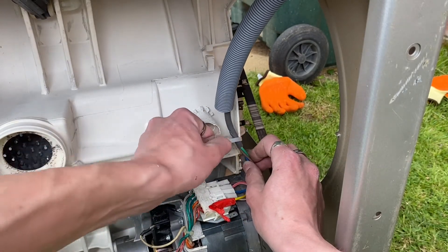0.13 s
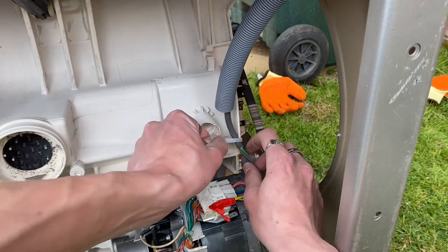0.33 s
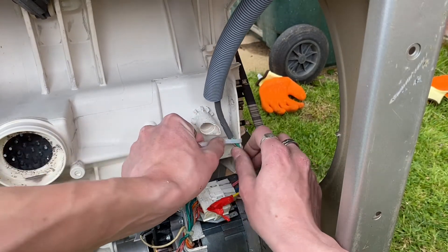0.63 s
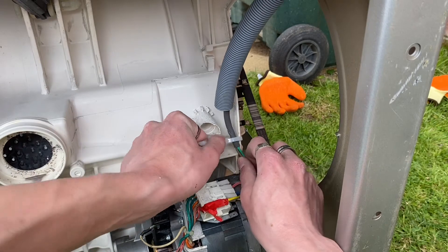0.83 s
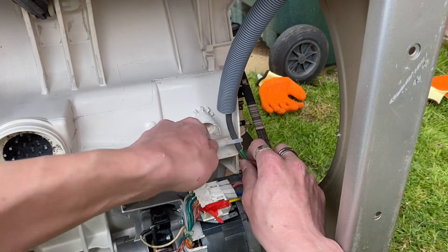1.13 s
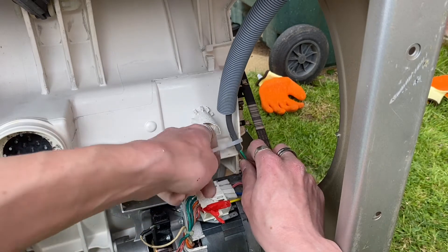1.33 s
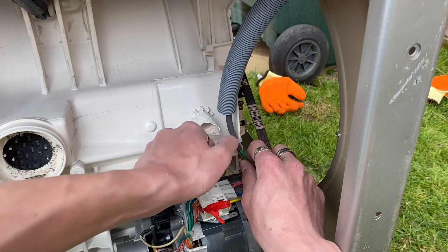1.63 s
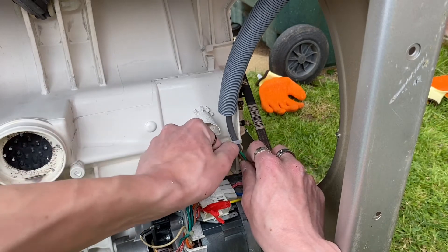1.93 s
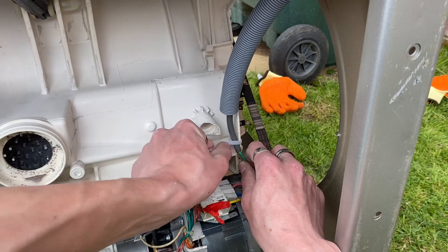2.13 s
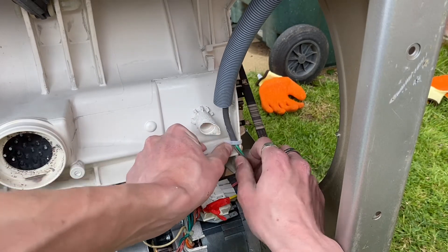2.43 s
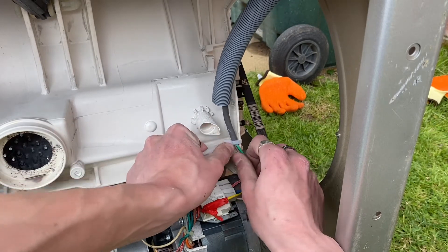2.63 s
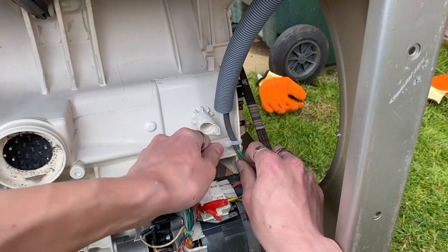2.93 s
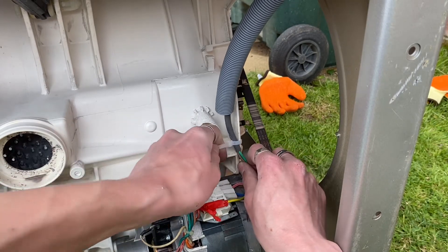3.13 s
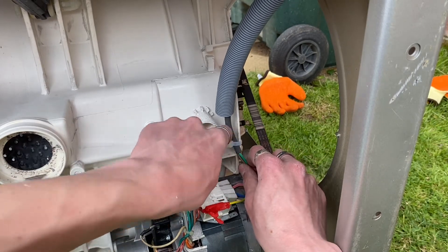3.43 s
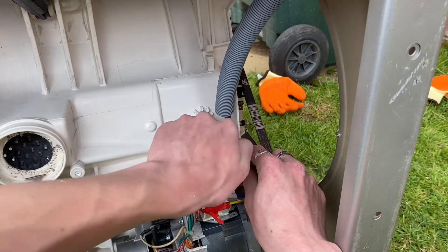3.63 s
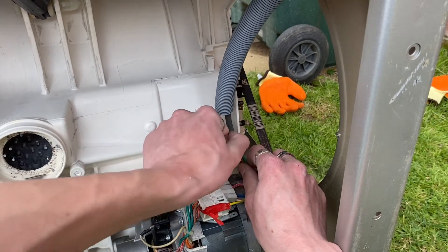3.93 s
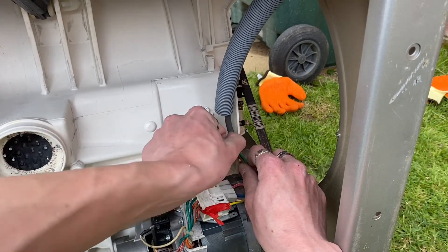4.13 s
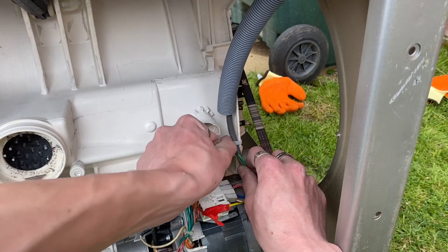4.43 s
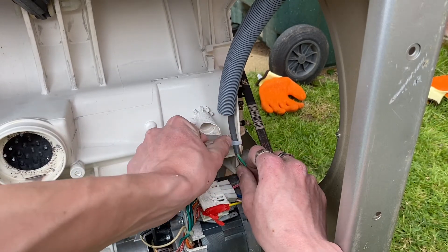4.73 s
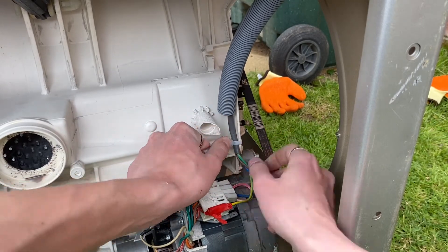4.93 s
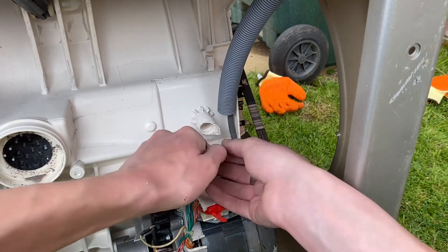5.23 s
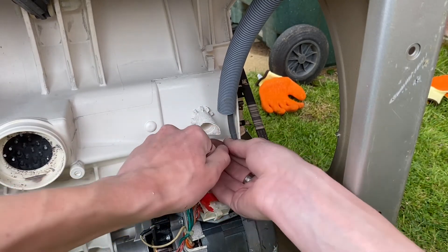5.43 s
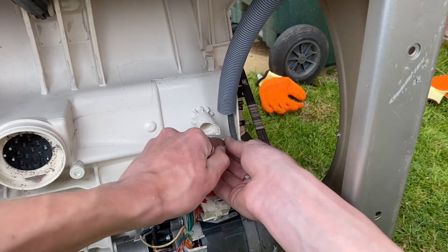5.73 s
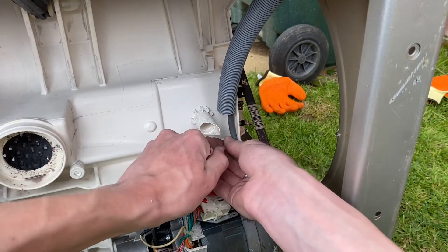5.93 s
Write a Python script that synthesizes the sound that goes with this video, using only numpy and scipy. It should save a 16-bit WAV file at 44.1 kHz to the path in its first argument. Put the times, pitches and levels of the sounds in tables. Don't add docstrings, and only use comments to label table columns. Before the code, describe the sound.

Close, dry outdoor sound of a cable tie being tightened by hand on a hollow plastic tub, over quiet low rumble and faint yard air. It begins at once with a fast zip of about twenty bright, crisp clicks, evenly packed to 0.3 s and slowing to separate ticks by 0.5, with a dull tick near 0.7. Light, scratchy fingertip scuffs and sleeve rustle fill 0.75 to 1.6. A second burst starts at 1.85, quickens around 2.0 to 2.2 and ends at 2.35. More scuffs follow from 2.8, with a muffled tick and small knock at 3.2 and a bright tick at 3.3. From 4.16 to 4.6 come eight slow, hard clicks, with a short jolt at 4.3 and a low thud at 4.5. Around 5.2 a palm drags softly and knuckles bump the tub; another bump comes at 5.5, the strongest snap at 5.63, and a lighter tick at 5.8.

```python
import sys
import numpy as np
from scipy import signal
from scipy.fft import rfft, irfft, next_fast_len
from scipy.io import wavfile
from scipy.ndimage import uniform_filter1d

SR = 44100
rng = np.random.default_rng(int(sys.argv[2]) if len(sys.argv) > 2 else 0)


def wav_record(signal):
    frames = np.transpose(np.atleast_2d(signal))
    bounded = np.clip(frames, -1, 1)
    quanta = np.round(bounded * 32767).astype(np.int16)
    wavfile.write(sys.argv[1], SR, quanta)


def linear_from_db(decibels):
    return 10 ** (np.asarray(decibels, float) / 20)


N = 267995

AIR_EDGES_HZ = [0, 160, 1200, 6000, 12500, 15900]
# frequency_hz, density_db
AIR_COLOUR = [(20, -40), (32, -21.5), (45, 4.5), (60, 3), (100, -2.5), (200, -9), (400, -11), (700, -13),
              (1000, -21.5), (2000, -27.5), (4000, -35.5), (6500, -41.5), (12000, -46), (16000, -43)]
# frequency_hz, correlation_ratio
AIR_LIKENESS = [(60, 0.969), (130, 0.866), (300, 0.69), (700, .1), (2000, 0.24), (6000, 0.12)]
# start_s, level_db
YARD_SWELL = [(0, 8), (.5, 6), (1.2, 1), (1.75, 1.5), (2.1, 4.5), (2.8, 2.1), (3.2, 1), (4.0, 1.5),
              (4.58, 4.5), (4.68, -11.5), (5.2, 1.5), (5.36, 3), (6.08, -0.5)]
# start_s, level_over_rest_db
HAND_MOTION = [(0, 28.5), (.24, 30.5), (.4, 12.5), (.9, 7.5), (1.3, 10.5), (1.8, 2), (2.1, 26), (2.45, 1.5),
               (2.7, 4.5), (2.88, 9.5), (3.12, 6.5), (3.38, 18), (3.9, 2), (4.4, 17), (4.7, 8), (5.21, 13),
               (5.28, 22), (5.85, 6)]
# rest_db, yard_share_ratio, motion_share_ratio, flicker_db
AIR_LAYERS = [
    (-57, 0.84, 0.03, -0.3),
    (-61.5, 0.47, 0.167, 0.5),
    (-72.5, 0, 0.37, 0.6),
    (-92.5, 0, 1.09, 0.8),
    (-99, 0.23, 1.05, -1.15),
]

# frequency_hz, width_hz, level_db # bright ring near 15.5 kHz that opens each click
SNAP_MODES = [(15900, 900, -18), (15480, 810, 5), (14900, 500, -6.5), (14100, 690, -14),
              (13200, 1500, -20.5)]
PAWL_MODES = [(6800, 410, 0.5), (7790, 500, -6), (7960, 3600, -5), (10500, 790, -5), (11720, 2500, -8.5)]
STRAP_MODES = [(4300, 64, -12.5), (4900, 260, -8), (4965, 250, 12), (5310, 65, -0.5), (5610, 650, -6.5),
               (6030, 300, -1.5)]
SHELL_MODES = [(1672.6, 100, 2.5), (1938, 52, 4), (2144, 160, -2.5), (2655, 240, -9), (2900, 300, -8),
               (3015, 70, -9), (3277, 110, -9.5), (3620, 270, -16.5)]
UPPER_TUB_MODES = [(981, 43, 3), (1040, 47, 1), (1147, 98, -0.5), (1311, 75, 5.5)]
LOWER_TUB_MODES = [(405, 17, -2), (536, 87, -3.5), (610, 18, 0.5), (675, 25, 2.5), (717, 13, -1)]
# low_hz, high_hz, trim_db, scatter_t60_s, likeness_ratio (-1 to
# 1), left_over_right_db
PARTS = [
    (12220, 15000, 1.3, 0.028, -0.79, 1),
    (6380, 11000, -1, 0.028, 0.48, 0.5),
    (4040, 5700, -3, 0.042, 0.58, 8),
    (1660, 3870, 0.5, 0.067, 0.21, 3.5),
    (880, 1320, -1, 0.12, -0.27, 4.5),
    (333, 676, -3.5, 0.062, 0.74, 2.5),
]

# start_s, force_db, snap_re_force_db
FIRST_PULL = [(0.012, -40, 4), (0.03, -43, 10.5), (0.0459, -40.5, 5), (0.0599, -41, 4.5),
              (0.0743, -42.5, 4.5), (0.0893, -45, 4), (0.1042, -41, 2), (0.1189, -47.5, 7.5),
              (0.1336, -43, 0), (0.1489, -43.5, -1), (0.1637, -44, 4.5), (0.1799, -43.5, 6),
              (0.1958, -45.5, 5.5), (0.2126, -44.5, 5), (0.2297, -43.5, 6.5), (0.2472, -45.5, 2.5),
              (0.2669, -43.5, 3), (0.2876, -44, 3), (0.3128, -43.5, 4), (0.3432, -43, 4),
              (0.3834, -43.5, 6), (0.4415, -45, 7), (0.5119, -45.5, 7)]
SECOND_PULL = [(1.8521, -42, -0.5), (1.9048, -38, 0.5), (1.9312, -39, 1.2), (1.953, -41, -1),
               (1.9814, -44, -1), (2.0063, -41.5, 2), (2.0266, -40.5, 1), (2.0413, -41, -0.43),
               (2.0581, -39, 2), (2.0748, -40.5, 3), (2.0918, -40.5, 6.5), (2.1082, -42, 5.5),
               (2.1233, -40.5, 9.5), (2.1381, -38.5, 8), (2.152, -39, 6.5), (2.1683, -37, -1.5),
               (2.1932, -38, -1), (2.2228, -39.5, -2.3), (2.2673, -43, 3), (2.3498, -41.5, 0)]
THIRD_PULL = [
    (4.159, -39, -1.7),
    (4.194, -39, -3),
    (4.2478, -43, -2),
    (4.311, -41.5, 10),
    (4.3754, -38, 7.5),
    (4.4256, -38, 9.5),
    (4.4944, -39, 8.5),
    (4.5866, -38.5, 5.5),
]
LONE_TICKS = [
    (0.646, -70.5, -2),
    (0.727, -48.5, -8.5),
    (3.1898, -48.5, -19),
    (3.3086, -40.5, 7),
    (5.6269, -33, -1.5),
    (5.7921, -45.5, 1),
]
# start_s, direct_over_scatter_db, pawl_tilt_db_per_octave, shell_tilt_db_per_octave, finger_damping_ratio
GRIP = [(0, 13.5, 13, 11.5, 0.92), (.25, 8, -9, 24, 1.3), (.5, 28.5, 26.5, 17.5, 1.4),
        (.72, -9, 39, -9.5, 1.56), (1.85, 13.5, -24, 22, 2.14), (2.12, 15, -9.5, 12, 1.25),
        (2.35, 14, -21, 7, 1.42), (3.19, -17, -36.5, 19, 1.4), (3.31, 5.5, 21, 18, 1.3),
        (4.24, 14.5, 23, -13.5, 1.15), (4.31, 24, -5.5, -1.5, 1.7), (4.6, 21, -16, -20.5, 1.4),
        (5.62, 14, 47, 2, 5.7)]
# start_s, strap_re_force_db, shell_re_force_db, tub_re_force_db, upper_over_lower_tub_db
CONTACT = [(0.03, -8, -10.5, -4, 2), (.2, 1, -5, -3.5, -1), (.44, -4.5, -1.1, -8.5, -2),
           (.51, -1, 3, 1.7, -0.5), (.646, 21.5, 6, 6, 0), (.727, -5.5, 4.5, 8, 3.5),
           (1.85, 1.5, -3, -5, 3), (2.0, 1.5, -1.5, -3, -0.5), (2.15, 4, -5.5, -8.5, -4),
           (2.35, 5, -9.5, -7.5, 5.5), (3.19, 0, -1.5, -1.3, -2), (3.31, 6.5, -4.5, -3, 0.5),
           (4.2, 1, -10.5, -3.2, 1.2), (4.31, 7, -5.5, 1, -3), (4.44, 5, -12.5, -10, -4.5),
           (4.59, -1.5, -20.5, -13, 1), (5.63, -16, -15, -23, -5)]

# start_s, treble_db, body_re_treble_db (pressure), length_s
SCUFFS = [(0.754, -54, 3, 0.028), (0.781, -65, 17.5, 0.062), (0.816, -64, 11, 0.021),
          (0.89, -56, -14, 0.02), (1.066, -43.5, -18, 0.055), (1.243, -57.5, 3.5, 0.026),
          (1.265, -57, -6, 0.03), (1.2826, -62, 10.5, 0.021), (1.325, -57.5, -16, 0.024),
          (1.383, -58, -19, 0.039), (1.45, -70, 12.5, 0.023), (1.593, -58.5, -26, 0.027),
          (2.825, -53, -5.5, 0.034), (2.8893, -44.5, -13, 0.047), (3.079, -80, 29.5, 0.024),
          (3.162, -75, 20.5, 0.019), (3.2664, -55.5, 7.5, 0.026), (3.4354, -51, -9.5, 0.015),
          (3.47, -54, -4.5, 0.025), (3.512, -56.5, -17.5, 0.025), (3.613, -69.5, 7.5, 0.017),
          (3.6525, -54, 11.5, 0.033), (3.8659, -66, 4, 0.022), (4.8469, -57.5, 5, 0.034),
          (5.125, -73, 15, 0.013), (5.156, -73.5, 21, 0.067), (5.245, -44, -20.5, 0.047),
          (5.3494, -64.5, 3, 0.025), (6.049, -74, 11.5, 0.023)]
# start_s, level_db, pitch_hz, t60_s
BUMPS = [
    (3.194, -40, 366, .14),
    (3.192, -43, 265, .07),
    (4.51, -40, 95, .08),
    (5.262, -43.5, 372, .11),
    (5.538, -42, 262, .07),
]
# start_s, level_db, pitch_hz, t60_s
JOLT = [
    (4.311, -31, 416, 0.026),
    (4.312, -31, 233, 0.023),
    (4.313, -35.5, 145, 0.055),
]
# level_db, low_hz, high_hz
PALM_RUB = (-61, 250, 7000)


def evened(x):
    return x / np.sqrt(np.mean(x ** 2) + 1e-20)


def read(points, hz):
    f, value = np.transpose(points)
    return np.interp(np.log(hz + 1), np.log(f + 1), value)


def at(curve, s):
    times, *columns = np.transpose(curve)
    return [np.interp(s, times, column) for column in columns]


def add(mix, s, sound):
    part = mix[:, max(round(s * SR), 0):][:, :sound.shape[1]]
    part += sound[:, :part.shape[1]]


def ring(x, modes):
    length = x.shape[-1]
    hz = np.fft.rfftfreq(2 * length, 1 / SR)
    gain = sum(linear_from_db(db) / (1 + 2j * (hz - f) / width) * hz / (hz + f) for f, width, db in modes)
    return irfft(rfft(x, 2 * length) * gain)[..., :length]


def tilted(modes, db_per_octave):
    middle = np.mean([np.log2(f) for f, width, db in modes])
    return [(f, width, db + db_per_octave * (np.log2(f) - middle)) for f, width, db in modes]


def widened(modes, factor):
    return [(f, width * factor, db) for f, width, db in modes]


def band(x, lo_hz, hi_hz):
    return signal.sosfilt(signal.butter(2, [lo_hz, hi_hz], "band", fs=SR, output="sos"), x)


def air():
    frames, hz = N // 256 + 5, np.fft.rfftfreq(1024, 1 / SR)
    a, b, c, d, patches = rng.standard_normal((frames, 513, 5)).T
    patches = uniform_filter1d(patches, size=10, axis=0)
    patches = evened(uniform_filter1d(patches, size=10, axis=1))
    same = read(AIR_LIKENESS, hz)[:, None]
    right = a + 1j * b
    left = same * right + np.sqrt(1 - same ** 2) * (c + 1j * d)
    spectra = np.array([left, right]) * linear_from_db(1.3 * patches)
    wash = signal.istft(spectra, nperseg=1024, noverlap=768)[1][:, :N]
    fast = next_fast_len(N)
    fine_hz = np.fft.rfftfreq(fast, 1 / SR)
    wash = rfft(wash, fast) * linear_from_db(read(AIR_COLOUR, fine_hz))
    t = np.arange(N) / SR
    (yard_db,), (motion_db,) = at(YARD_SWELL, t), at(HAND_MOTION, t)
    flicker = evened(uniform_filter1d(rng.standard_normal(N), size=500))
    out = np.zeros((2, N))
    for lo, hi, (db, swell, moved, flicker_db) in zip(AIR_EDGES_HZ, AIR_EDGES_HZ[1:], AIR_LAYERS):
        layer = evened(irfft(wash * (fine_hz >= lo) * (fine_hz < hi), fast)[:, :N])
        out += linear_from_db(db + swell * yard_db + moved * motion_db + flicker_db * flicker) * layer
    return out


def slack_strap(strap_db, chance):
    pitch = 1 + 0.015 * np.tanh(chance)
    widening = linear_from_db(0.78 * np.clip(-strap_db, 0, 12))
    return [(f * pitch, width * widening, db) for f, width, db in STRAP_MODES]


def tie(size=4096):
    out, t = np.zeros((2, N)), np.arange(size) / SR
    teeth = sorted(FIRST_PULL + SECOND_PULL + THIRD_PULL + LONE_TICKS)
    grips = rng.standard_normal((40, 2, size))
    moved = rng.standard_normal((len(teeth), 2, size))
    fresh, teeth_per_grip = 0.21, 7.59
    late_db, late_t60_s = -35, 0.26
    crack = linear_from_db(-1.5) * band(np.outer([1.3, 1], t == t[12]), 600, 18000)
    for k, ((s, force_db, snap_db), new) in enumerate(zip(teeth, moved)):
        direct_db, pawl_tilt, shell_tilt, damping = at(GRIP, s)
        strap_db, shell_db, tub_db, upper_db = at(CONTACT, s)
        grip, turn = divmod(k / teeth_per_grip, 0.98)
        angle = turn * np.pi / 2
        held = np.cos(angle) * grips[int(grip)] + np.sin(angle) * grips[int(grip) + 1]
        a, b = np.sqrt(1 - fresh) * held + np.sqrt(fresh) * new
        strap = slack_strap(strap_db, new[0, -1])
        pawl, shell = tilted(PAWL_MODES, pawl_tilt), tilted(SHELL_MODES, shell_tilt)
        banks = SNAP_MODES, pawl, strap, shell, UPPER_TUB_MODES, LOWER_TUB_MODES
        levels = snap_db, 0, strap_db, shell_db, tub_db + upper_db / 2, tub_db - upper_db / 2
        add(out, s, linear_from_db(force_db + direct_db) * crack)
        for modes, part_db, (lo_hz, hi_hz, trim_db, t60, same, pan_db) in zip(banks, levels, PARTS):
            if hi_hz < 8000:
                modes, t60 = widened(modes, damping), t60 / np.sqrt(damping)
            fade = linear_from_db(-60 * t / t60) + linear_from_db(late_db - 60 * t / late_t60_s)
            fade = fade * np.minimum(t / 0.000091, 1)
            drive = np.array([np.sqrt(1 - same ** 2) * a + same * b, b]) * fade
            drive[:, [12, 21]] += linear_from_db(direct_db) * np.outer([same, 1], [1, -.4])
            part = band(ring(drive, modes), lo_hz, hi_hz) * linear_from_db(np.array([[pan_db], [0]]))
            early_rms = np.sqrt(np.mean(part[:, :441] ** 2))
            add(out, s, linear_from_db(force_db + part_db + trim_db) * part / early_rms)
    return out


def scuffs():
    out = np.zeros((2, N))
    grit = rng.standard_normal((len(SCUFFS), 3, 4096))
    modes = widened(UPPER_TUB_MODES + SHELL_MODES[:5], 0.7)
    for (s, db, body_db, length), (a, b, clump) in zip(SCUFFS, grit):
        middle_db = -0.5 + 0.58 * body_db
        u = np.arange(4096) / SR / length
        clumping = linear_from_db(0.94 * evened(uniform_filter1d(clump, size=60)))
        stroke = np.minimum(u / 0.56, 1) * np.exp(-3.2 * u ** 2) * clumping
        rub = np.array([1.322 * a + .5 * b, b])
        tone = evened(band(rub, 4100, 15600)) + linear_from_db(middle_db) * evened(band(rub, 2890, 5540))
        body = ring(rub * stroke, modes)
        body = linear_from_db(body_db + 8) * body / abs(body).max()
        add(out, s - 0.17 * length, linear_from_db(db - 4.5) * (tone * stroke + body))
    return out


def bumps():
    out, t = np.zeros((2, N)), np.arange(8000) / SR
    for s, db, hz, t60 in BUMPS + JOLT:
        onset = 1 - np.exp(-t * hz / 0.63)
        mode = linear_from_db(db + 3 - 60 * t / t60) * onset * np.sin(2 * np.pi * hz * t)
        add(out, s, np.array([mode, mode]))
    return out


def palm():
    db, lo_hz, hi_hz = PALM_RUB
    middle_s, half_s = 5.2, .23
    a, b, clump = rng.standard_normal((3, N))
    swell = np.exp(-((np.arange(N) / SR - middle_s) / half_s) ** 2)
    swell = swell * linear_from_db(2.4 * evened(uniform_filter1d(clump, size=300)))
    dull = signal.lfilter([1], [1, -.88], np.array([a + 0.35 * b, b]))
    return linear_from_db(db) * swell * evened(band(dull, lo_hz, hi_hz))


def scene():
    return air() + tie() + scuffs() + bumps() + palm()


def top_cut(x):
    return signal.sosfilt(signal.butter(12, 17160, fs=SR, output="sos"), x)


def record(dry):
    one_port_hz, turn_hz, in_step_hz = 6200, 4300, 6800
    fast = next_fast_len(N)
    hz = np.fft.rfftfreq(fast, 1 / SR)
    left, right = rfft(dry, fast)
    treble = np.clip((hz - one_port_hz) / 500 + .5, 0, .97)
    late = right * np.exp(-2j * np.pi * (hz - in_step_hz) / turn_hz)
    left = irfft(np.sqrt(1 - treble ** 2) * left + treble * late, fast)[:N]
    edge = signal.firwin(numtaps=97, cutoff=16550, window="blackman", fs=SR)
    limited = signal.oaconvolve(np.array([left, dry[1]]), edge[None], "same")
    return top_cut(limited)


dry = scene()
out = record(dry)
wav_record(out)
```